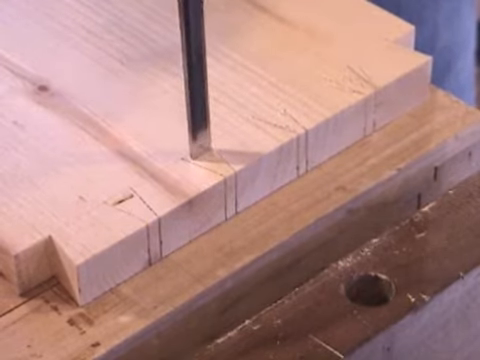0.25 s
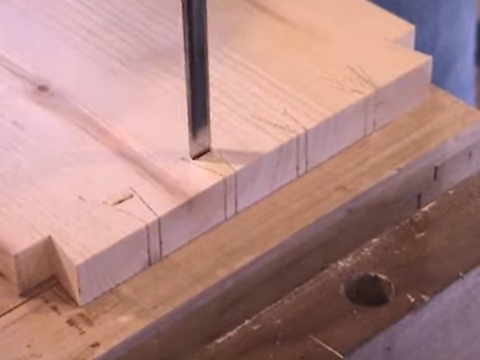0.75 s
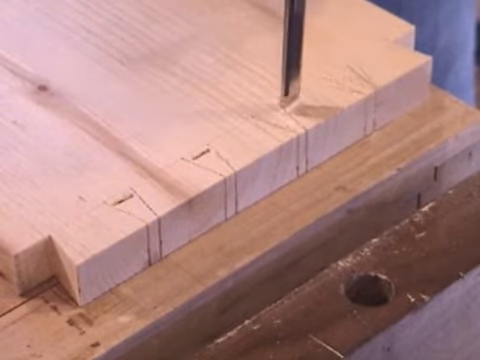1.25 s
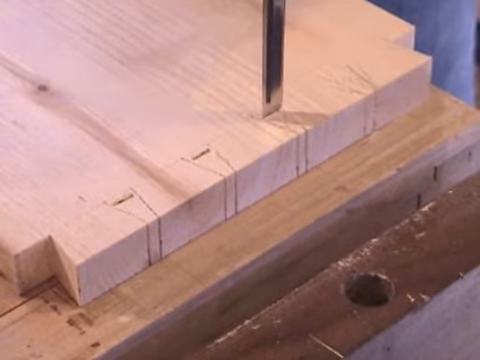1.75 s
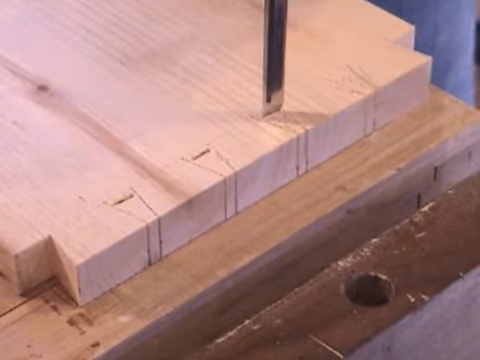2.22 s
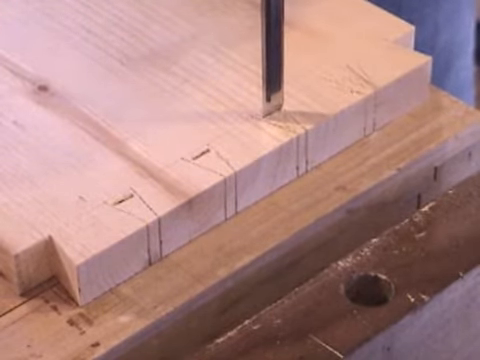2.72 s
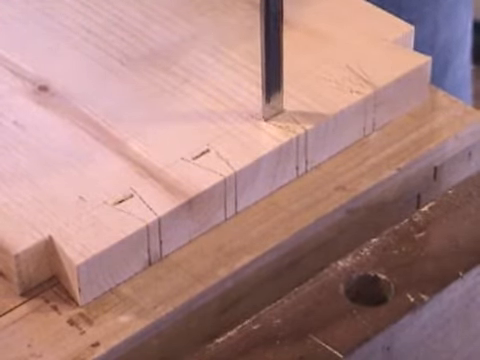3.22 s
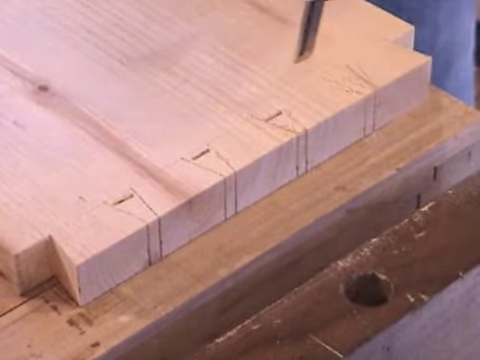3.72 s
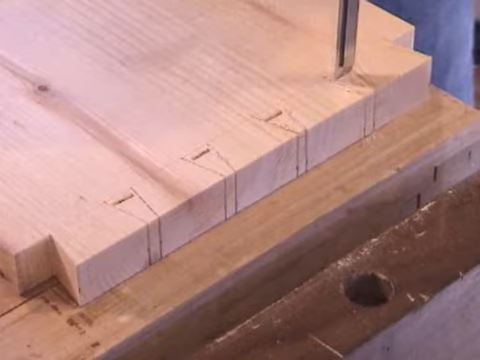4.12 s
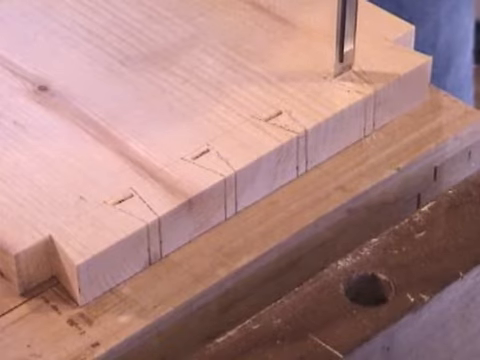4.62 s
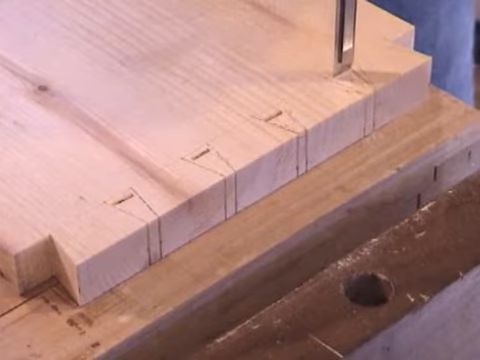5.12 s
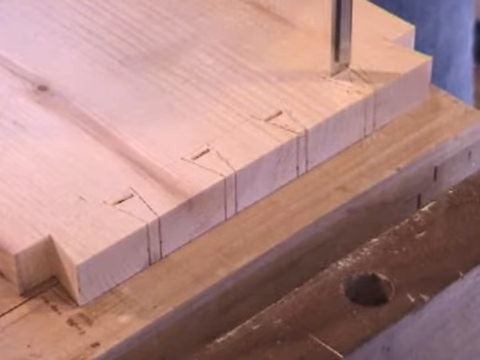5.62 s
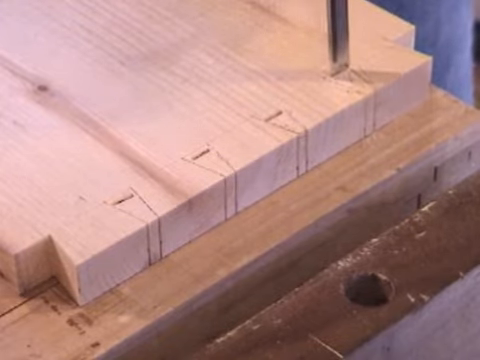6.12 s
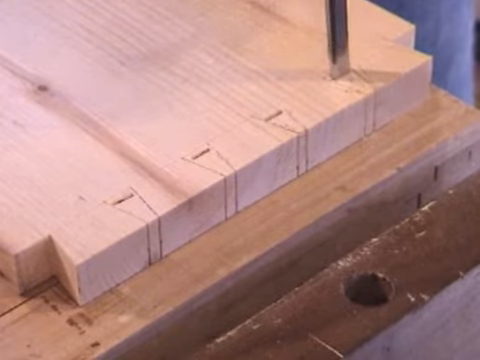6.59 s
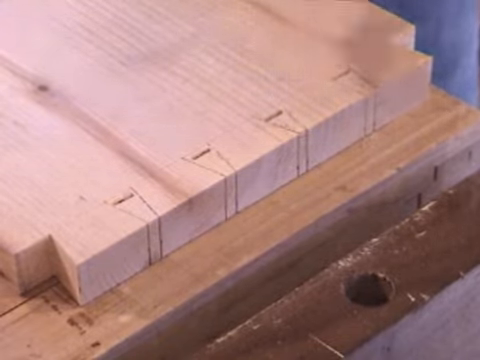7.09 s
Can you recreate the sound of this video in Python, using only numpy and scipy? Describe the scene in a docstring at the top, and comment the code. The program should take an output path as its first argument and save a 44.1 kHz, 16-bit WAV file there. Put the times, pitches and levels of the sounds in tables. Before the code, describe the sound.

Three sharp double knocks of mallet-struck chisel splitting pine on a bench, each ringing briefly in the shop, with faint hum and whine between.

```python
"""First a moment of still air, mains hum and a small motor's whine and buzz; then a mallet drives a chisel into pine.
Three cuts on a workbench, two blows each, a hair right of centre in stereo, in a hard-walled shop.
A blow is a diving snap and split fibres (noise), ringing wood and bench (decaying sines) and a roar of decaying noise.
The chisel is nudged on the board (swelling noise) and its edge ticks (short rings and noise).
The recorder's limiter holds the roar level until it dies; hum and whine are sines, the buzz is a looped rattle."""
import sys
import numpy as np
from scipy import signal
from scipy.fft import rfft, irfft
from scipy.io import wavfile

SR = 44100
rng = np.random.default_rng(int(sys.argv[2]) if len(sys.argv) > 2 else 0)


def generate_wav(sig):
    """Save sig (samples, or channels by samples) to the path in sys.argv[1] as 16-bit PCM at SR."""
    pcm = np.round(np.clip(np.atleast_2d(sig).T, -1, 1) * 32767).astype(np.int16)
    wavfile.write(sys.argv[1], SR, pcm)


N = 324135
BANDS_HZ = 28 * 2 ** (np.arange(27) / 3)  # third-octave centres
AGE_S = np.arange(2 * SR) / SR  # time since contact
SIDES = np.array([[1], [-1]])  # left, right

# cuts, with the tone of each spot on the board (relative levels):
# set_s, drive_s, body_db (350 Hz), knock_db (850 Hz), crack_db (4 kHz), snap_db
CUTS = [(0.0834, 0.43, 0.9, 3.5, 1.5, -6), (2.8768, 3.2272, -0.5, 1.5, -1.5, -2),
        (6.108, 6.4691, 1, -1.5, -0.5, -7.5)]
# the first blow sets the edge; the second is harder and finds it seated in the wood
SET_DB, DRIVE_DB = 1.2, 4
SET_SWEEP_S, DRIVE_SWEEP_S = 0.00055, 0.000616  # time for the snap's pitch to halve
# diffuse sound of a blow: pitch_hz, level_db (per Hz, relative)
ROAR = [(30, -14), (70, -17.5), (110, -11), (190, -7), (330, -1.5), (780, 1), (1130, -4), (1550, -2.5),
        (2500, -11.5), (3300, -14.5), (4600, -18), (6500, -25), (9500, -29.5), (11400, -44)]
# change of tone once the edge is seated: pitch_hz, change_db
SEATED = [(850, -0.5), (1130, 1.5), (1550, -2.5), (2300, 3.5), (6000, 1.5)]
# wood fibres parting under the edge: pitch_hz, level_db (per Hz, relative)
FIBRES = [(300, -31), (2300, 13), (4500, -14), (7000, -27), (11000, -24)]
# ringing of board, bench and shop together: pitch_hz, level_db (relative)
WOOD_MODES = [(221, -7), (324, 0), (352, -3), (414, -4), (430, -1), (457, -4), (505, -1), (533, -3),
              (547, -3), (608, -5), (656, -3), (725, -3), (743, -1), (782, -2), (806, -2), (821, -1),
              (930, 0), (960, -5), (1027, -6), (1085, -6), (1137, -7), (1252, -6), (1407, -7), (1499, -9),
              (1715, -9), (1928, -10), (1970, -10)]
# low modes of the bench, which beat as they fade: pitch_hz, level_db, t60_s
BENCH_MODES = [(134.6, -7, 0.46), (132, -46, 2.93), (145.4, -44.5, 2.2)]
# decay in the shop: pitch_hz, t60_s
SHOP_DECAY = [(60, 0.29), (250, 0.63), (700, 0.55), (1800, 0.52), (4000, 0.45), (10000, 0.18)]
# stereo width of the blows and handling: pitch_hz, side_minus_mid_db
SHOP_WIDTH = [(30, -9), (80, -13), (140, -14), (250, -11.5), (600, -10.5), (1300, -9), (2500, -8),
              (4500, -5.5), (6500, -2), (9000, 1.5), (11000, 3)]
# the chisel is set down and rocked on the board: start_s, level_db (relative), swell_s, pitch_hz
NUDGES = [(1.161, -50, .015, 840), (1.215, -50.5, 0.013, 804), (2.53, -59, 0.022, 860),
          (3.852, -52, 0.025, 790), (5.169, -52, 0.022, 890)]
# the edge ticks on the grain: start_s, level_db (relative)
TICKS = [(3.8624, -41.5), (5.679, -61)]
# the blade rings when it ticks: pitch_hz, level_db (relative), t60_s
BLADE_MODES = [(1700, -3, .025), (3700, -7, .025), (5000, -8, .025)]
# steady air and hiss: pitch_hz, level_db (per Hz, relative)
AIR = [(30, -8), (90, -7.5), (180, -8.5), (300, -3.5), (420, -8.5), (560, 0.5), (850, 1.5), (1300, -2.5),
       (2000, -10.5), (3200, -15.5), (5000, -13.5), (7000, -15.5), (9800, -19.5), (11500, -30)]
AIR_DB = -53.5
# stereo width of the still air: pitch_hz, side_minus_mid_db
AIR_WIDTH = [(30, 2), (80, 4), (140, 1), (220, -1), (500, -5), (1200, -7), (2500, -5), (4500, 0),
             (6500, -1), (11000, -1)]
# mains hum before panning: pitch_hz, level_db (rms), left_lead_rad
HUM = [(120, -73, 1.6), (240, -67.5, 1.4), (300, -72.5, .8), (360, -60, .85), (480, -70.5, .8)]
# the motor whines on odd multiples of its drive rate, loudest around one broad peak
DRIVE_HZ, WHINE_ORDERS = 74.93, np.arange(9, 31, 2)
WHINE_PEAK_HZ, WHINE_DB = 1085, -67
WHINE_RISE_DB_PER_OCTAVE, WHINE_FALL_DB_PER_OCTAVE = 7, 10.5
# tones at which the motor's housing sings, in two clusters: pitch_hz, level_db (relative)
HOUSING_TONES = [(2692, -75), (2853, -73), (2912, -75), (3015, -77), (3171, -75), (3327, -79), (3784, -79),
                 (6293, -81), (6465, -79), (6519, -80)]
# the motor's buzz in its housing: pitch_hz, level_db (per Hz, relative)
BUZZ = [(1500, -23), (2300, -2.5), (2850, 2), (3300, -4.5), (4200, -7), (5600, -22.5), (6400, -4),
        (7400, -23), (9800, -17.5), (11500, -30)]
CUTOFF_HZ = 11300


def mallet():
    """Each cut is a setting blow and a driving blow, both coloured by the spot on the board."""
    out, same_path = np.zeros((2, N)), shop_paths()
    for set_s, drive_s, body_db, knock_db, crack_db, edge_db in CUTS:
        colour = [(130, 0), (350, body_db), (850, knock_db), (1700, 0), (4000, crack_db)]
        add(out, set_s, blow(SET_DB, False, SET_SWEEP_S, colour, edge_db, same_path))
        add(out, drive_s, blow(DRIVE_DB, True, DRIVE_SWEEP_S, colour, edge_db, same_path))
    return out * panned(-0.21)


def blow(force_db, seated, sweep_s, colour, edge_db, same_path,
         roar_db=2.5, modes_db=-15.0, snap_db=1, bench_db=0, split_db=1, split_t60=0.019, build_s=0.0013):
    """A snap and a crunch of fibres, then bench and shop ring, much the same way every time."""
    alike = 0.45  # share of noise power common to all blows
    mode_scatter_db, mode_spread_rad = 2.2, 0.25
    paths = np.sqrt(alike) * same_path + np.sqrt(1 - alike) * shop_paths()

    decays = np.array([fade(t60) for t60 in at_hz(SHOP_DECAY, BANDS_HZ)])
    tone_db = at_hz(colour, BANDS_HZ) + seated * at_hz(SEATED, BANDS_HZ)
    gains = band_gains(ROAR) * from_db(roar_db + tone_db)
    # sum over bands, keeping sides and time
    roar = np.einsum("b,bt,bct->ct", gains, decays, paths)
    split = from_db(split_db) * fade(split_t60) * np.tensordot(band_gains(FIBRES), paths, 1)

    # each blow strikes the modes a little differently, by chance, on top of the cut's colour
    wood = np.zeros((2, len(AGE_S)))
    for hz, db in WOOD_MODES:
        struck_db = modes_db + db + at_hz(colour, hz) + mode_scatter_db * rng.standard_normal()
        wood += from_db(struck_db) * ring(hz, at_hz(SHOP_DECAY, hz), mode_spread_rad)
    bench = sum(from_db(bench_db + db) * ring(hz, t60, mode_spread_rad) for hz, db, t60 in BENCH_MODES)

    # the heavy wood takes a moment to get moving
    build = 1 - np.exp(-AGE_S / build_s)
    body = build * (from_db(force_db) * (roar + wood + split) + bench * panned(-2.0))
    return body + from_db(snap_db + edge_db) * snap(sweep_s)


def snap(sweep_s, top_hz=10500, t60=0.029):
    """A bending wave spreads out on its way: its treble arrives first, so the pitch dives within a millisecond."""
    phase = 2 * np.pi * top_hz * sweep_s * np.log1p(AGE_S / sweep_s)
    return -np.sin(phase) * fade(t60)


def shop_paths():
    """The countless reflections of the shop as noise, band by band, not yet decaying."""
    return band_noise(len(AGE_S), SHOP_WIDTH)


def handling():
    """Soft dull nudges of the chisel and tiny ticks of its edge."""
    return nudges() + ticks()


def nudges(nudge_db=4.0):
    """The chisel set down on wood: noise narrowly peaked at one pitch, swelling and dying away."""
    out = np.zeros((2, N))
    for start_s, db, swell_s, hz in NUDGES:
        wood = [(hz / 16, -34), (hz / 4, -11), (hz / 1.25, -18), (hz, 0), (hz * 1.25, -21), (hz * 8, -50)]
        # loudest swell_s after contact
        swell = AGE_S / swell_s * np.exp(1 - AGE_S / swell_s)
        thud = np.tensordot(band_gains(wood), shop_paths(), 1)
        add(out, start_s, from_db(nudge_db + db) * swell * thud)
    return out


def ticks(tick_t60=0.027, tick_room_db=-17):
    """The struck blade rings briefly over a burst of noise with a quiet tail from the shop."""
    out = np.zeros((2, N))
    edge = band_gains([(300, 9), (1500, -15), (5000, -17), (11000, -24)])
    decay = fade(tick_t60) + from_db(tick_room_db) * fade(at_hz(SHOP_DECAY, 4000))
    for start_s, db in TICKS:
        steel = sum(from_db(mode_db) * ring(hz, t60) for hz, mode_db, t60 in BLADE_MODES)
        contact = decay * np.tensordot(edge, shop_paths(), 1)
        add(out, start_s, from_db(db) * (steel + contact))
    return out


def background(buzz_db=-60.0):
    """Air and hiss, mains hum to the left, the motor's whine to the right and its buzz."""
    air = from_db(AIR_DB) * np.tensordot(band_gains(AIR), band_noise(N, AIR_WIDTH), 1)
    hum = sum(tone(hz, db, lead, waver_hz=0.074) for hz, db, lead in HUM)
    motor = motor_whine() * panned(-4.5) + from_db(buzz_db) * motor_buzz()
    return air * panned(-1.1) + hum * panned(2.0) + motor


def motor_whine(housing_db=1):
    """Odd harmonics of the drive that fall away on both sides of a peak, and the housing's own tones."""
    pitches = DRIVE_HZ * WHINE_ORDERS
    octaves = np.log2(pitches / WHINE_PEAK_HZ)
    slope_db = np.minimum(WHINE_RISE_DB_PER_OCTAVE * octaves, -WHINE_FALL_DB_PER_OCTAVE * octaves)
    lines = list(zip(pitches, WHINE_DB + slope_db))
    lines += [(hz, db + housing_db) for hz, db in HOUSING_TONES]
    return sum(tone(hz, db, rng.normal(0, 0.41), waver_hz=0.31) for hz, db in lines)


def motor_buzz(turn_hz=29.84, pulse_depth=0.5, side_share=0.67):
    """The same faint rattle comes round on every turn, pulsing with each of five poles: a dense comb of lines."""
    poles = 5
    size = round(SR / turn_hz)
    pulses = 1 + pulse_depth * np.cos(2 * np.pi * poles * np.arange(size) / size)
    mid, side = pulses * rng.standard_normal((2, size))
    rattle = mid + side_share * side * SIDES
    hz = np.maximum(np.arange(size // 2 + 1) * SR / size, 1)
    housing = from_db(at_hz(BUZZ, hz)) * (hz > BUZZ[0][0])  # nothing below the table
    turn = irfft(rfft(rattle) * housing, size)
    return np.tile(turn / turn.std(), N // size + 1)[:, :N]


def tone(hz, db, lead, waver_hz):
    """A steady line that wanders a little in pitch; the left side leads by this many radians."""
    knots = np.linspace(0, N, 40)
    pitch = hz + waver_hz * np.interp(np.arange(N), knots, rng.standard_normal(len(knots)))
    phase = 2 * np.pi * (np.cumsum(pitch) / SR + rng.random())
    return from_db(db) * np.sqrt(2) * np.sin(phase + lead / 2 * SIDES)


def ring(hz, t60, spread=0):
    """A decaying mode; spread (rad) sets how far its phase differs between the two sides."""
    phase = rng.uniform(0, 2 * np.pi) + spread * rng.standard_normal((2, 1))
    return np.sin(2 * np.pi * hz * AGE_S + phase) * fade(t60)


def fade(t60):
    """Exponential decay from the moment of contact, 60 dB down after t60 seconds."""
    return np.exp(-np.log(1000) * AGE_S / t60)


def band_noise(size, width):
    """Third-octave bands of stereo noise, equal per Hz: bands x 2 x size."""
    # a quarter second of lead-in lets the filters settle
    white, bands = rng.standard_normal((2, 2, size + SR // 4)), []
    for k, hz in enumerate(BANDS_HZ):
        edges = [hz / 2 ** (1 / 6), hz * 2 ** (1 / 6)]
        sos = signal.butter(2, edges, "band", fs=SR, output="sos")
        # neighbouring bands draw on separate noises
        mid, side = signal.sosfilt(sos, white[k % 2])[:, -size:]
        bands.append(mid + from_db(at_hz(width, hz)) * side * SIDES)
    return np.array(bands)


def band_gains(spectrum):
    """Gains that give the bands this spectrum and a nominal total rms of one."""
    gains = from_db(at_hz(spectrum, BANDS_HZ))
    return gains / np.sqrt(np.sum(gains ** 2 * BANDS_HZ) / SR)


def at_hz(points, hz):
    """Read a table on a log-frequency axis."""
    freqs, values = np.transpose(points)
    return np.interp(np.log(hz), np.log(freqs), values)


def from_db(db):
    """Decibels to gain."""
    return 10 ** (np.asarray(db) / 20)


def panned(left_db):
    """Gains for the two sides, the left one louder by left_db."""
    return from_db(left_db / 2 * SIDES)


def add(out, start_s, sound):
    """Mix a sound in at start_s, cut off at the end of the scene."""
    start = round(start_s * SR)
    out[:, start:start + sound.shape[-1]] += sound[..., :N - start]


def scene():
    """Everything heard at the bench."""
    return mallet() + handling() + background()


def limiter(x, ceiling_db=0.0, release_db_per_s=130, attack_s=0.000071):
    """The gain of both sides drops almost at once on a peak and climbs back steadily."""
    peak_db = 20 * np.log10(np.abs(x).max(axis=0) + 1e-9)
    over = np.maximum(peak_db - ceiling_db, 0)
    ramp = release_db_per_s * np.arange(N) / SR
    held = np.maximum.accumulate(over + ramp) - ramp  # hold peaks, release in a straight line
    r = np.exp(-1 / (attack_s * SR))
    return x * from_db(-signal.lfilter([1 - r], [1, -r], held))


def record(dry):
    """Limiter, a hard shoulder on what slips past it, and the top cut."""
    x = limiter(dry)
    x = x / (1 + (x / .74) ** 8) ** (1 / 8)
    top_cut = signal.ellip(10, .2, 90, CUTOFF_HZ, fs=SR, output="sos")
    return signal.sosfilt(top_cut, x)


dry = scene()
out = record(dry)
generate_wav(out)
```